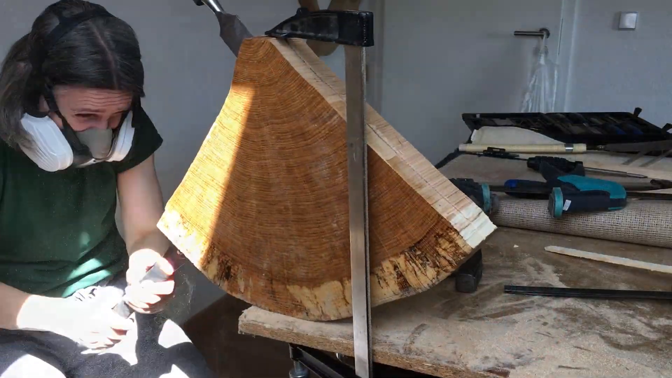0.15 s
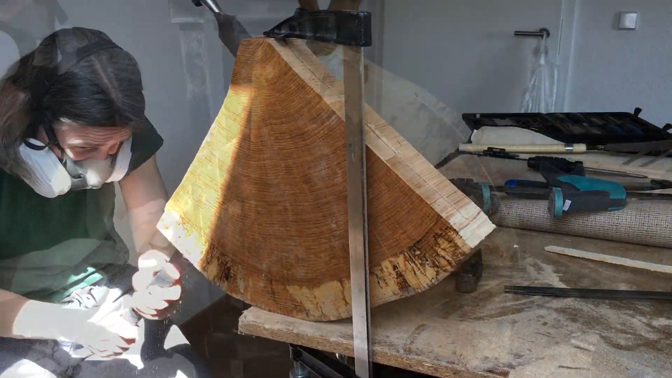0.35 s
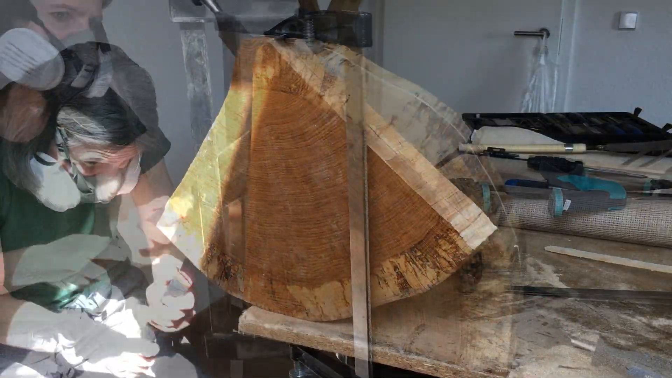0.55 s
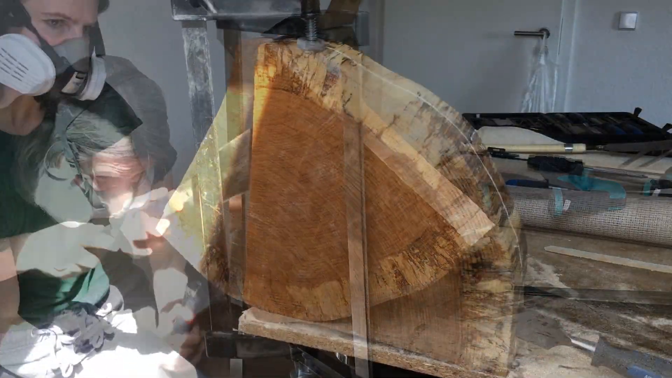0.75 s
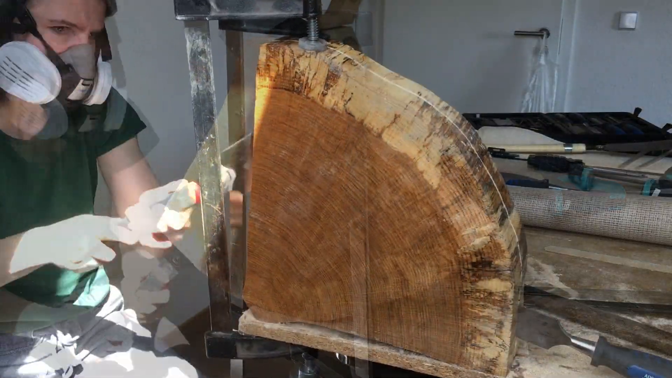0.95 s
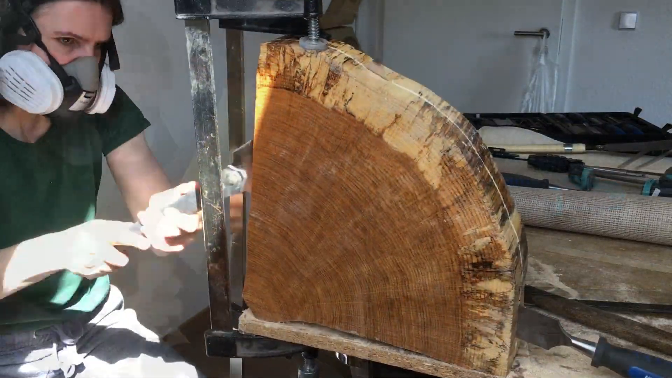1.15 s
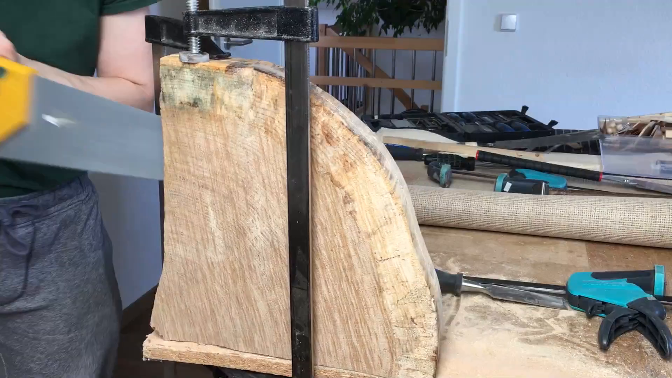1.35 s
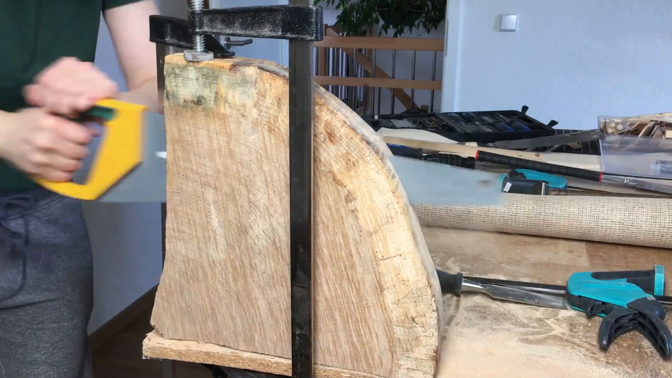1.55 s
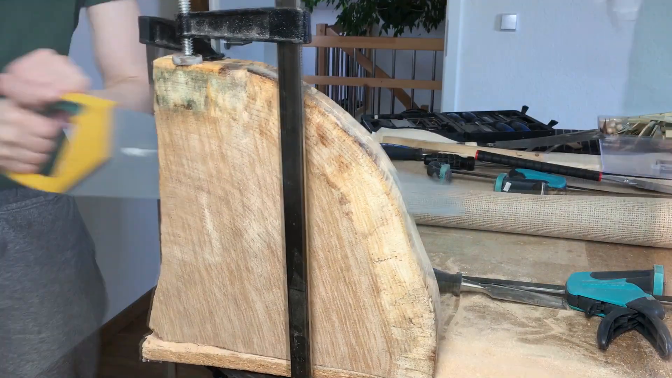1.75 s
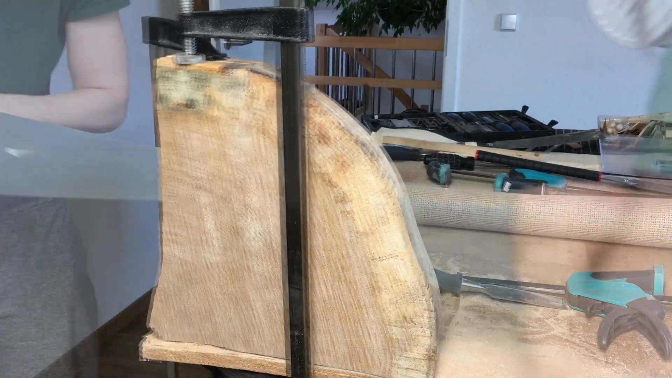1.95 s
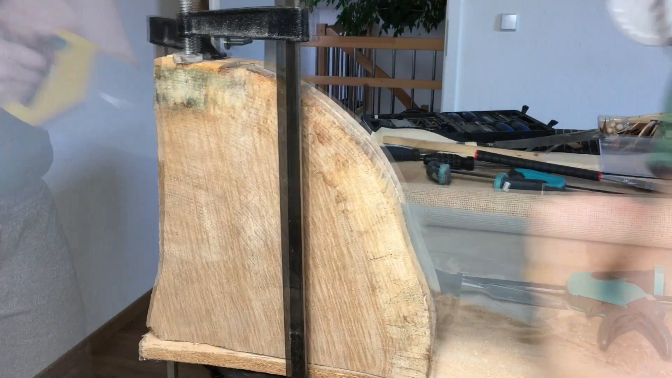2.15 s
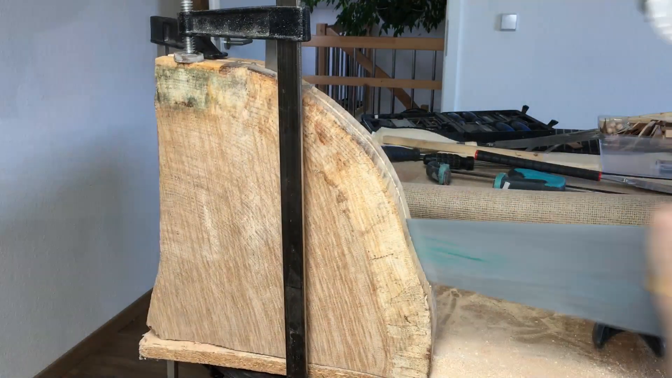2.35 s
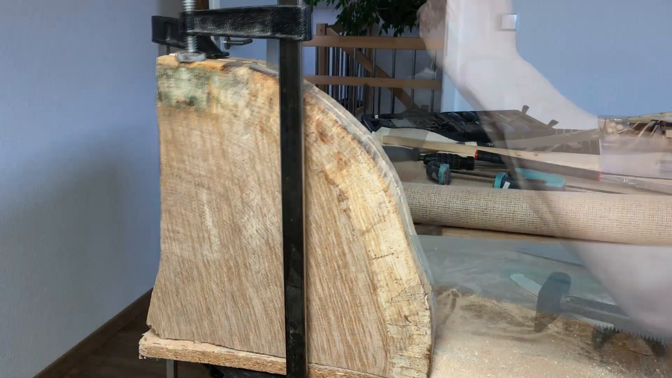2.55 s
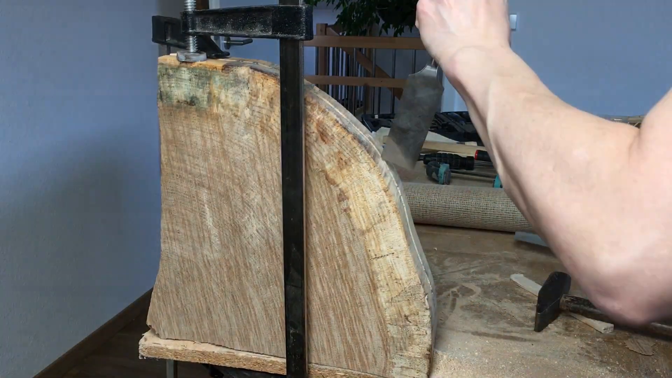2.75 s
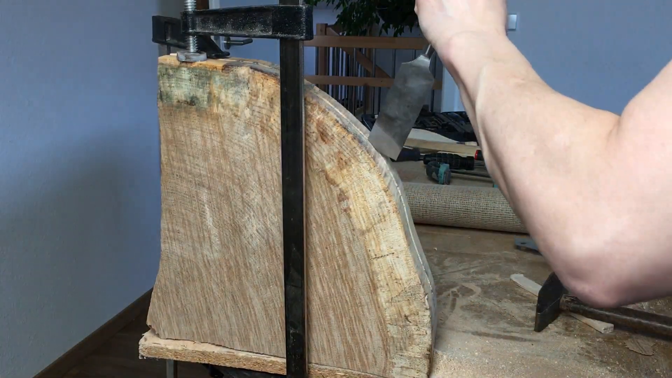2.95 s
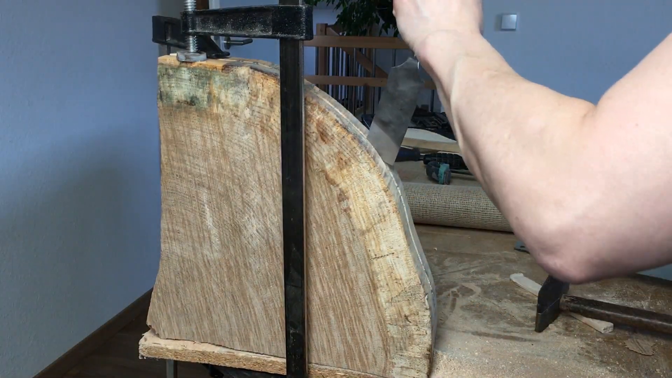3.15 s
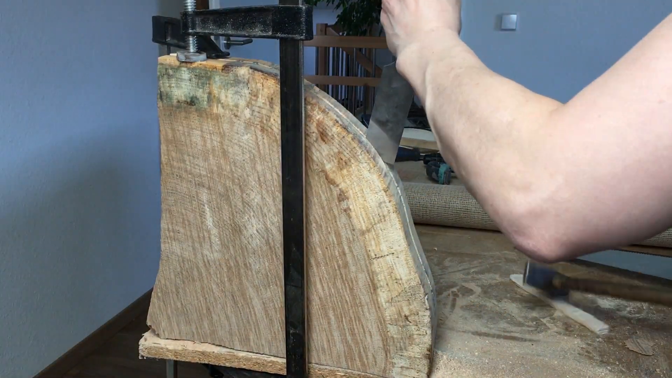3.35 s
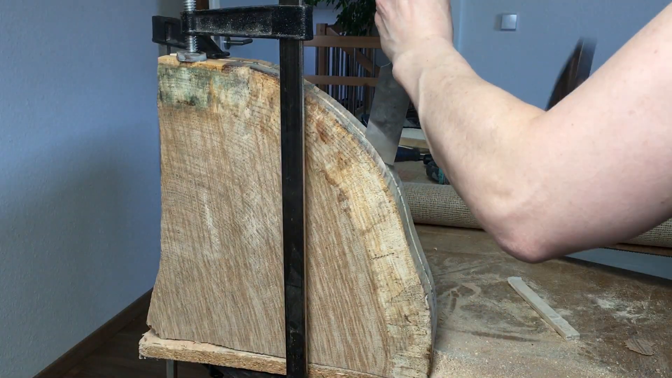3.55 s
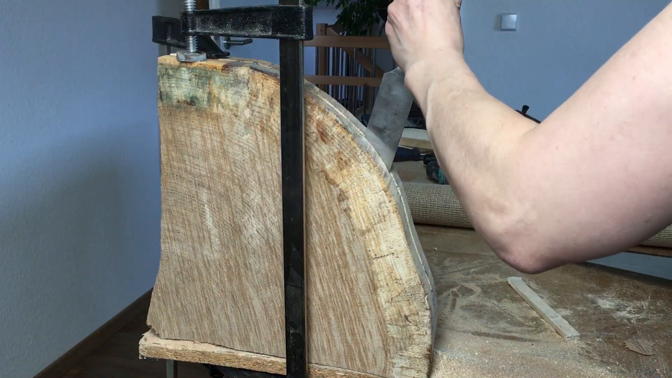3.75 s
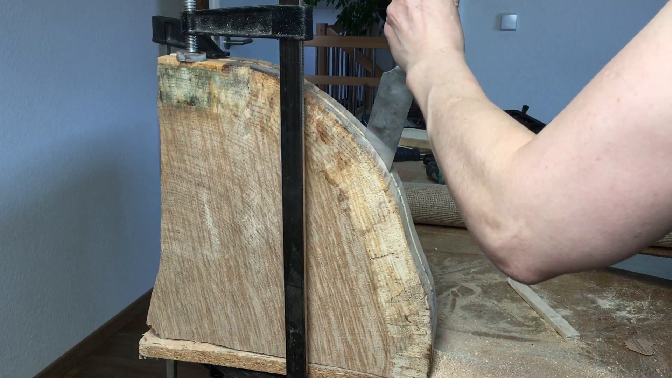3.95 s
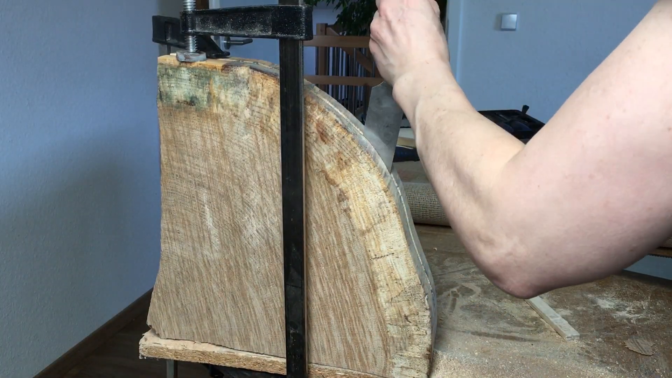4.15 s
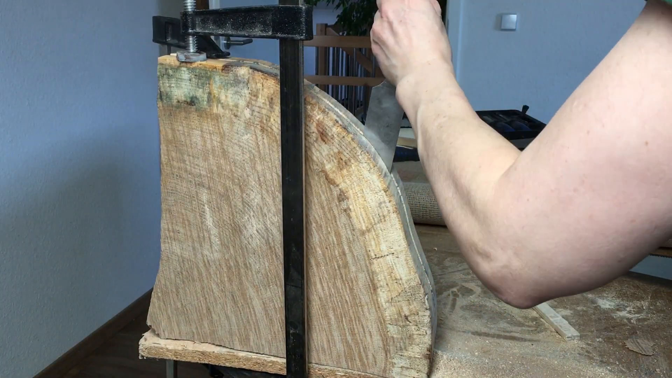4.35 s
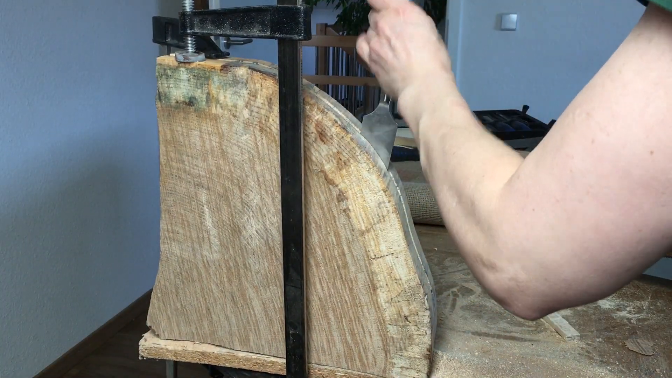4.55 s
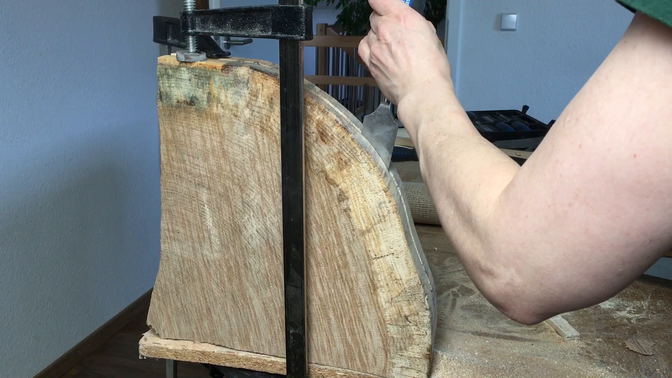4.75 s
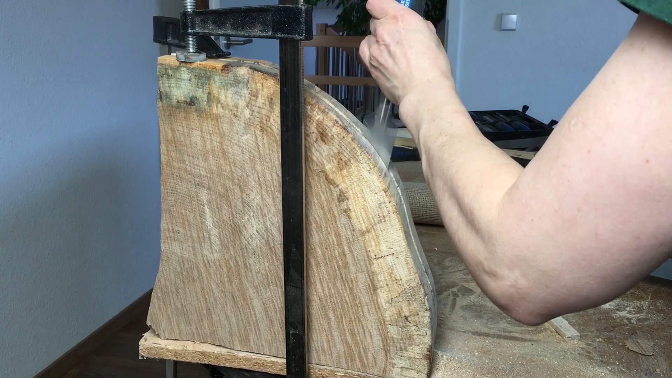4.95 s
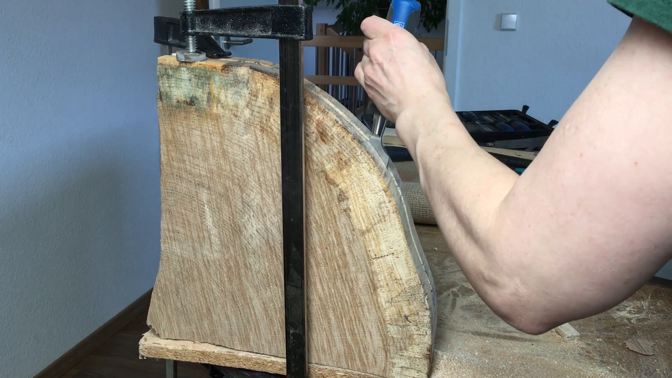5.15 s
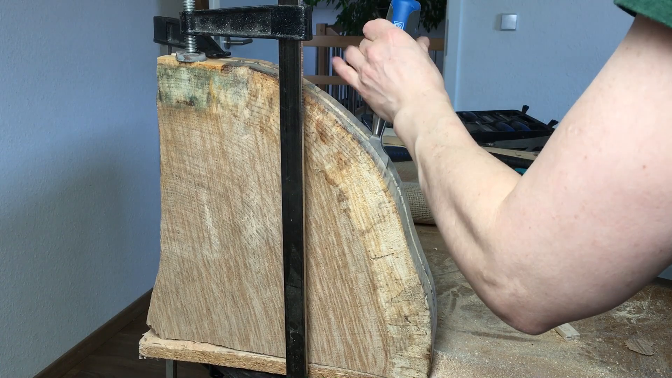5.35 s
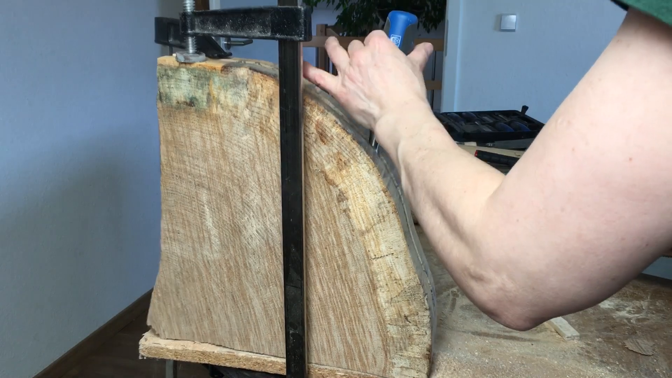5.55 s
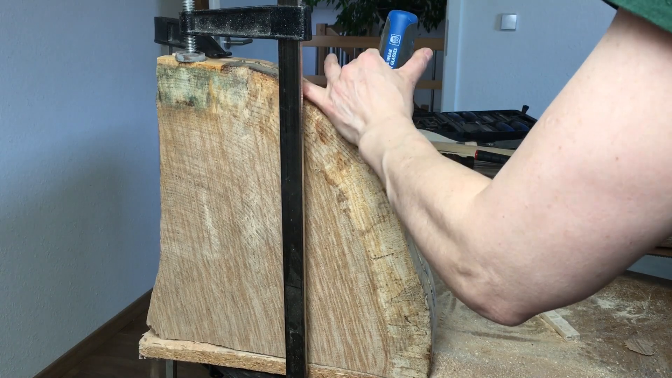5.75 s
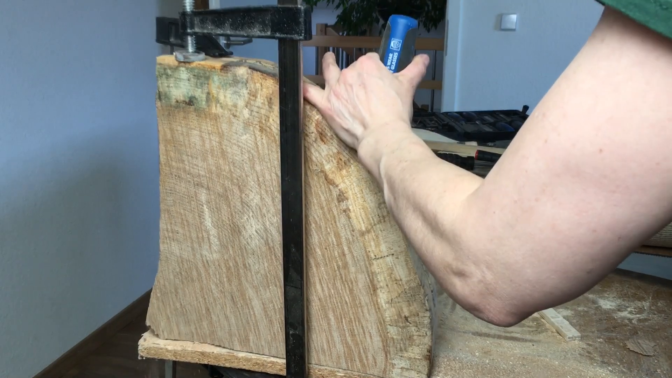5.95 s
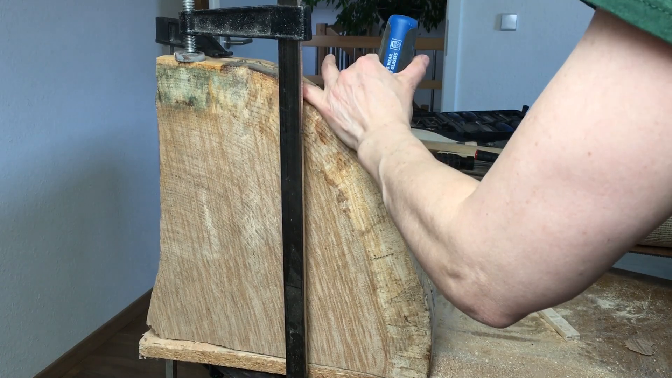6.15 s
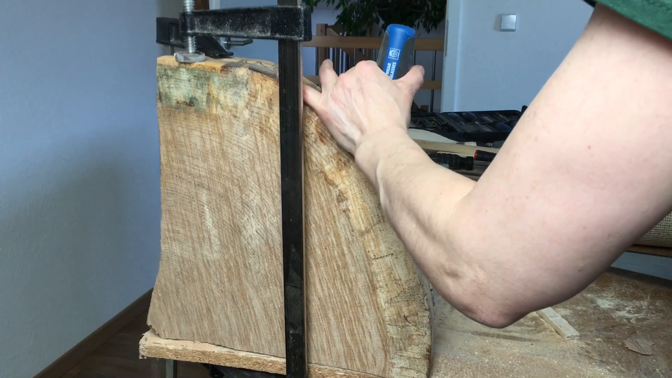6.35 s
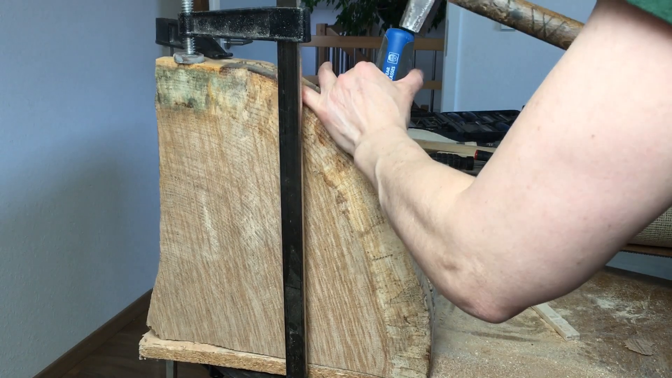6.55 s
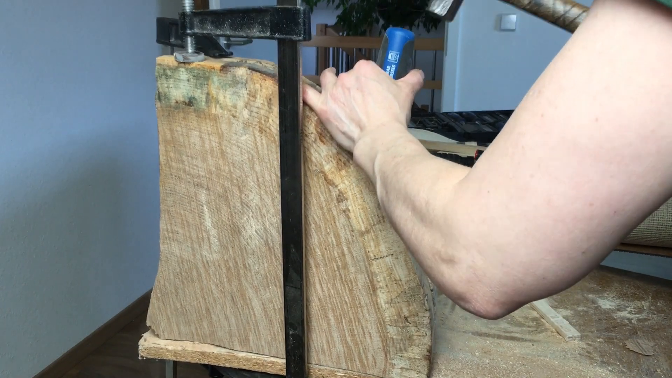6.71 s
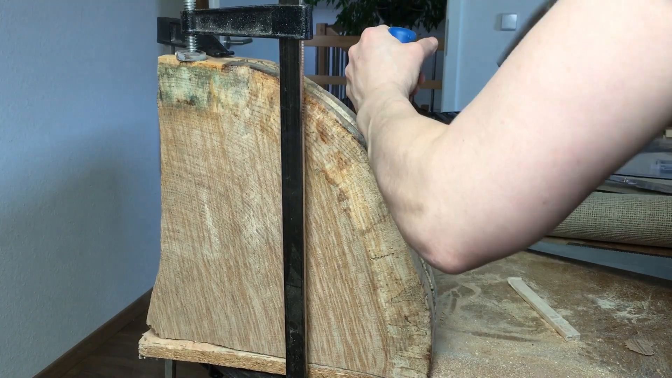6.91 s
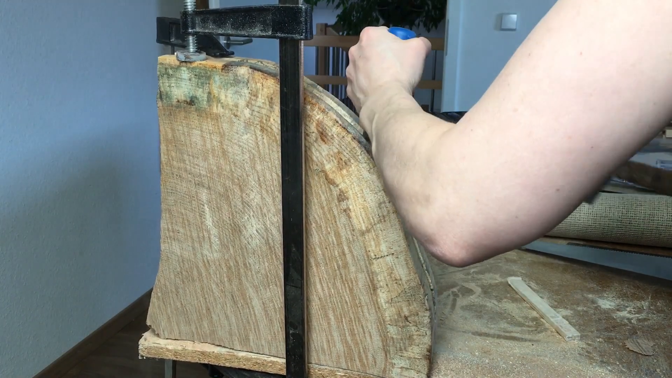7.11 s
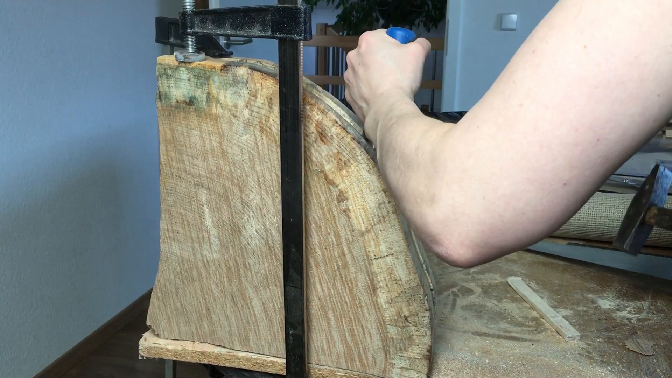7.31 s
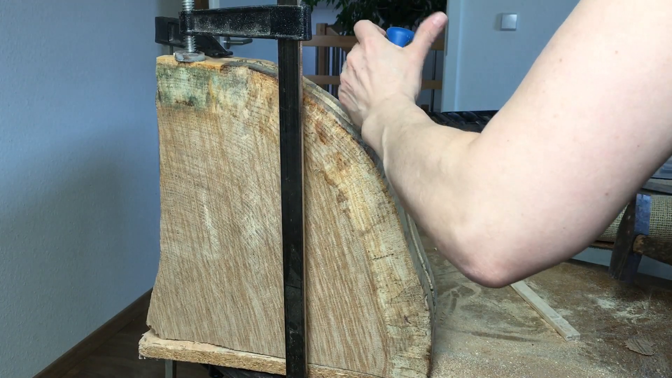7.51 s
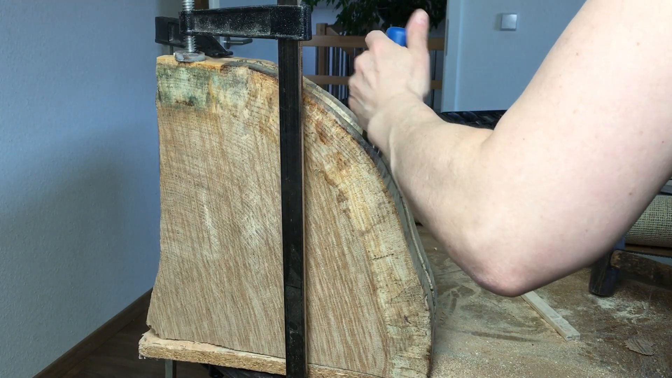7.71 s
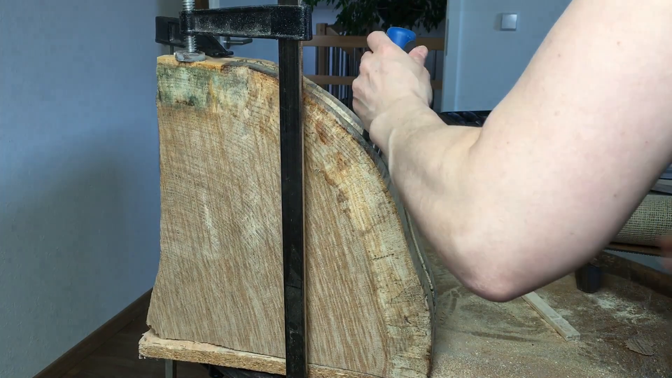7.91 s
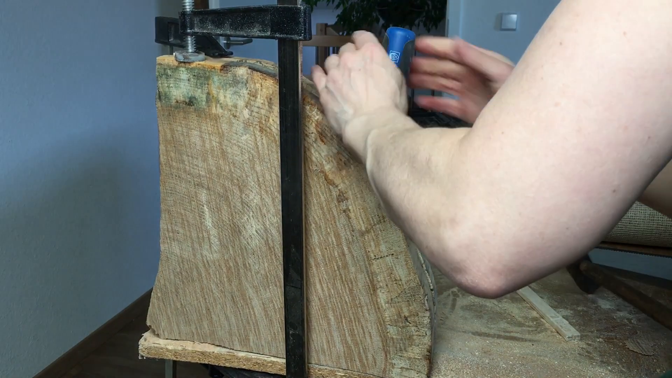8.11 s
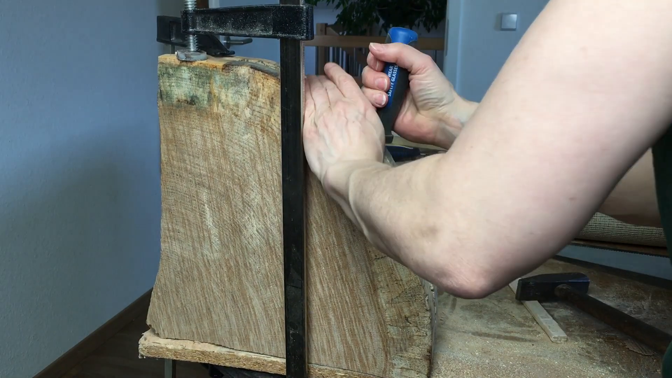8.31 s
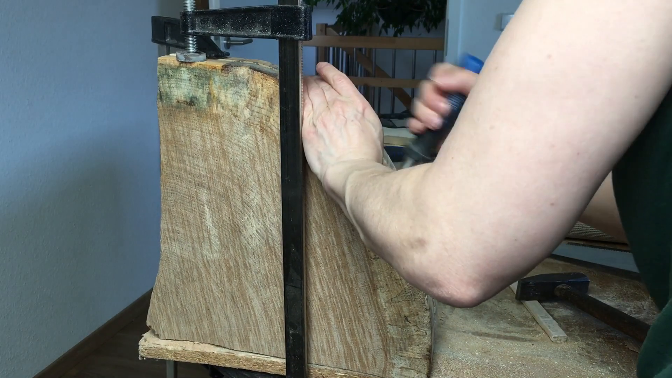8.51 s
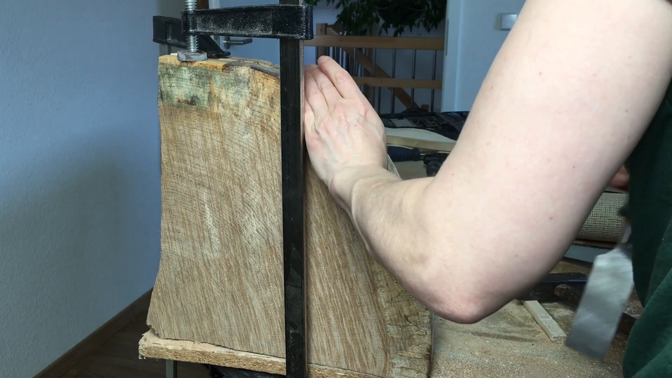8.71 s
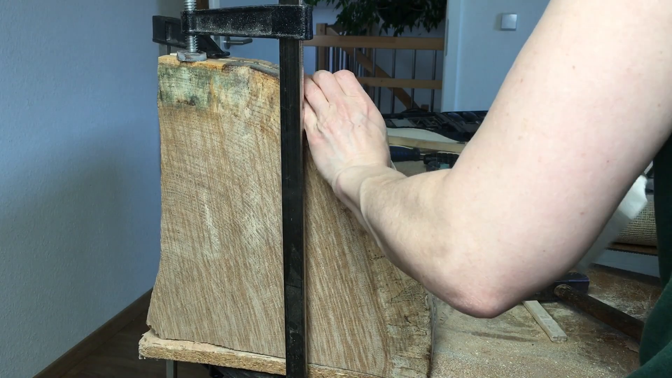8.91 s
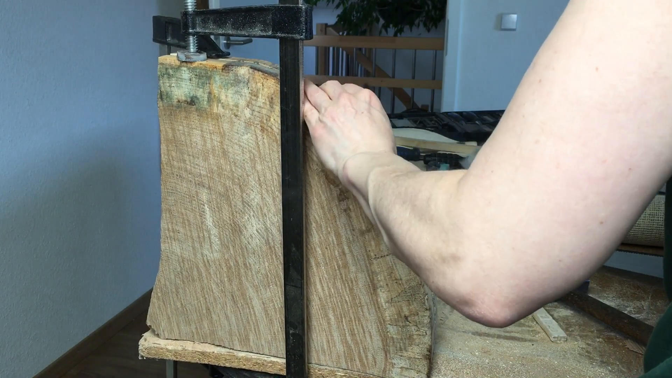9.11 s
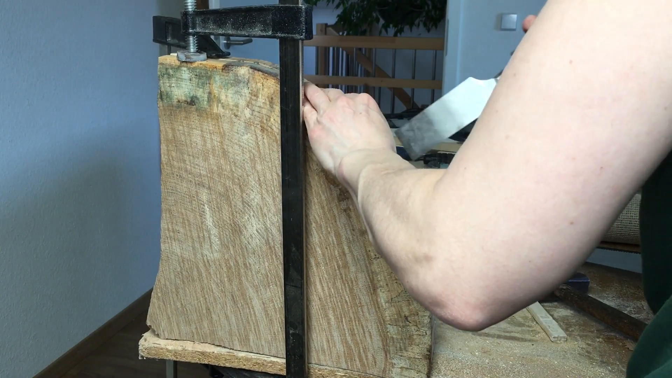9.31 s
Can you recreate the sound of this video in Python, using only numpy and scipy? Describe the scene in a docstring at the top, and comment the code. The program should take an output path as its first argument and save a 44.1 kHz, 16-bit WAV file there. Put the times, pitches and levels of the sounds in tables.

```python
"""In a small workshop a handsaw races through a clamped slab in very quick strokes, broken by short silences:
noise grains hiss and ring the kerf, swelling with each stroke. The saw is pulled out amid rustles, drags and
breath-like swells of shaped grains, and its wobbling blade sings as a gliding tone. Then a hammer drives
chisels into the slab: noise cracks die band by band, slab modes thud and steel modes ring. At last tools are
laid down, with more knocks, and sleeves rustle."""
import sys
import numpy as np
from scipy import signal
from scipy.fft import rfft, irfft
from scipy.io import wavfile

SR = 44100
rng = np.random.default_rng(int(sys.argv[2]) if len(sys.argv) > 2 else 0)


def volts(x):
    """Linear amplitude factor 10**(x/20) for a level x in dB, scalar or array-like."""
    e = np.asarray(x, float) / 20
    return 10 ** e


def store_pcm(level_fs):
    """Save levels as 16-bit WAV."""
    pcm = np.round(np.clip(level_fs, -1, 1) * 32767).astype(np.int16)
    wavfile.write(sys.argv[1], SR, np.atleast_2d(pcm).T)


N = 413216
SECONDS = np.arange(N) / SR

# Gaps where all sound drops out. Each row: start in seconds, end in seconds.
SILENCES = [(0.025, 0.029), (0.105, 0.108), (1.226, 1.268), (1.506, 1.549), (2.386, 2.404)]
# The sawyer's effort. Each row: time in seconds, relative tooth hiss in dB, relative bite in dB,
# push over pull in hiss in dB, push over pull in bite in dB.
EFFORT = [(0.017, -35, -50, -4, 1), (0.077, -35.5, -41.5, 2, 27), (0.168, -41, -45, 6.5, -2),
          (0.33, -39, -48, 7, -2), (0.72, -36.5, -43.5, 3, 8), (0.85, -35.5, -42.5, -1, 6.5),
          (1.2, -36, -44.5, 2, 11), (1.28, -29, -38, 5, 10), (1.5, -28.5, -37, 3.5, 3),
          (1.67, -29, -39, 2, 9.5), (2.0, -30, -36, -2.5, 12.5), (2.23, -26.5, -35.5, 2, 17),
          (2.39, -25.5, -29.5, 1.5, 5.5), (2.5, -29, -33, 11, 5), (2.671, -34.5, -48.5, -5.5, 13),
          (2.72, -53, -56, 0.1, 0.1)]
# Hammer on chisel, rebounds included. Each row: time in seconds, then relative crack, thud and treble in dB.
HAMMER = [(4.1369, -3, -31, -13.5), (4.581, -6.5, -30, -7.5), (4.5981, -4.5, -35, -22),
          (5.016, -1, -27.5, -2), (5.441, -3, -19.5, -10.5), (5.45, -26.5, -14, -21.5),
          (5.8707, -2, -13, -6.5), (6.2448, 1, -15.5, -2), (6.6039, -1, -14.5, -9),
          (6.8318, -11.5, -37.5, -7)]


def rms_one(x):
    """Scale to rms 1."""
    return x / np.sqrt(np.mean(x ** 2) + 1e-20)


def filtered(x, order, hz, kind="low"):
    """Butterworth filter."""
    return signal.sosfilt(signal.butter(order, hz, kind, fs=SR, output="sos"), x)


def in_time(rows):
    """Columns of a curve at every sample."""
    s, *columns = np.transpose(rows)
    return [np.interp(SECONDS, s, c) for c in columns]


def at_hz(points, hz, column=1):
    """Read a table on a log-frequency axis."""
    points = np.array(points)
    return np.interp(np.log(hz), np.log(points[:, 0]), points[:, column])


def clicks_at(times, sizes):
    """A train of single-sample clicks."""
    out = np.full(N, 1e-18)
    out[np.round(np.asarray(times) * SR).astype(int)] = sizes
    return out


def ring(clicks, hz, t60):
    """A unit click sets a decaying sine of starting height 1 ringing."""
    r = volts(-60 / (t60 * SR))
    w = 2 * np.pi * hz / SR
    return signal.lfilter([0, np.sin(w)], [1, -2 * r * np.cos(w), r * r], clicks)


def width_t60(width):
    """Decay time in seconds of a resonance of this width in Hz."""
    return np.log(1000) / (np.pi * width)


def dying(clicks, t60):
    """A unit click starts an exponential fall from 1."""
    return signal.lfilter([1], [1, -volts(-60 / (t60 * SR))], clicks)


def coloured(x, spectrum):
    """Shape white input by a spectrum; rms 1."""
    hz = np.arange(1, N // 2 + 2) * SR / N
    return rms_one(irfft(rfft(x) * volts(at_hz(spectrum, hz)), N))


def grains(per_s, spread_db):
    """Random clicks of uneven size; rms 1."""
    sizes = volts(spread_db * np.minimum(rng.exponential(1, N), 4)) * rng.standard_normal(N)
    return rms_one(sizes * (rng.random(N) < per_s / SR))


def flicker(per_s):
    """Random wander, joining normal draws of spread 1 made per_s times a second."""
    knots = rng.standard_normal(2000)
    return np.interp(SECONDS * per_s, np.arange(2000), knots)


def swell(rows):
    """Power of movements that rise for a share of their length, then die away."""
    rise_share, fall_db = 0.17, 21
    out = np.zeros(N)
    for start, length, peak_db in rows:
        u = (SECONDS - start) / length
        rise = np.clip(u / rise_share, 0, 1)
        fall = np.clip(u - rise_share, 0, 9) / (1 - rise_share)
        out += (rise * volts(peak_db - fall_db * fall)) ** 2
    return out


def all_blows():
    """Hammer and knocks as columns: time in seconds; crack, thud, wood, treble in dB; share of sharp tick."""
    # Tools and wood knocked or laid down. Each row: time in seconds, then relative crack, thud, wood in dB.
    knocks = [(2.621, -44, -35, -44), (2.6982, -39.5, -35.5, -40), (2.9191, -35.5, -54, -31),
              (3.4279, -45.5, -40, -64.5), (7.7845, -30.5, -8.5, -19.5), (7.925, -69, -30, -59),
              (8.0602, -15, -17, -19), (8.278, -9.5, -3.5, -16), (8.5601, -24.5, -36, -22),
              (8.632, -26.5, -39, -44)]
    rows = []
    for s, crack, thud, treble in HAMMER:
        wood = crack - 3.5 + 0.31 * (thud - crack)  # between crack and thud
        rows.append((s, crack, thud, wood, treble, .95))
    for s, crack, thud, wood in knocks:
        rows.append((s, crack, thud, wood, crack - 13.5, 0.56))
    return np.transpose(rows)


def room_hum():
    """The room hums faintly: steady noise, strongest in the bass around 150 Hz."""
    # Each row: frequency in Hz, relative density in dB.
    room_colour = [(88, -24.5), (150, -15), (309, -40), (361, -23), (484, -27.5), (1260, -32.5),
                   (4860, -46.5), (16000, -43.5)]
    return volts(-62) * coloured(rng.standard_normal(N), room_colour)


def bench_rumble():
    """The bench rumbles as weight leans on it and shakes on after each thud: low noise."""
    # Each row: frequency in Hz, relative density in dB.
    rumble_colour = [(15, -33), (25, -5.5), (65, 2), (92, 2.5), (166, -11.5), (209, -3), (400, -14.5),
                     (520, -41), (880, -120)]
    # Weight leans on the bench. Each row: start in seconds, length in seconds, relative peak in dB.
    leans = [(2.405, 0.69, -42), (2.8, 0.69, -37.5), (3.35, 0.55, -57), (8.5, 1.06, -50)]
    s, _, thud_db, *_ = all_blows()
    shake = dying(clicks_at(s, volts(thud_db - 25.5)), 1.51)
    power = swell(leans) + shake ** 2 + volts(-65) ** 2  # the last keeps it murmuring at rest
    return np.sqrt(power) * volts(1.5 * flicker(10)) * coloured(rng.standard_normal(N), rumble_colour)


def sleeve_rustle():
    """Sleeves and chips rustle: dense uneven grains that swell and die away."""
    # Each row: frequency in Hz, relative density in dB.
    rustle_colour = [(880, -32), (1500, -2), (1590, -2), (4040, -9), (4920, -12), (15100, -10),
                     (16000, -10)]
    # Each row: start in seconds, length in seconds, relative peak in dB.
    rustles = [(2.405, .5, -80), (3.25, 0.23, -53), (3.36, 0.37, -51), (3.63, 0.175, -55), (5.6, .25, -60),
               (6.7, 0.15, -65), (8.47, 0.42, -49.5), (8.75, 0.63, -55.5)]
    level = np.sqrt(swell(rustles) + volts(-77) ** 2)
    return level * volts(2.5 * flicker(25)) * coloured(grains(per_s=9000, spread_db=2.5), rustle_colour)


def drags_and_breaths():
    """Drags and breath-like swells: sparser, duller grains that rise and die away."""
    # Each row: frequency in Hz, relative density in dB.
    swell_colour = [(240, -45.5), (400, -6.5), (594, 8.5), (899, 0), (1260, 1.5), (2470, -14),
                    (4000, -17.5), (5200, -21.5), (8800, -120)]
    # Each row: start in seconds, length in seconds, relative peak in dB.
    swells = [(2.405, 0.81, -41.5), (2.895, 0.38, -45.5), (3.25, 0.47, -49.5), (3.63, 0.22, -58.5),
              (3.8, .35, -58), (7.25, 1.26, -63.5), (8.47, 0.44, -44), (8.7, 0.89, -47.5)]
    dull = coloured(grains(per_s=3900, spread_db=2.5), swell_colour)
    return np.sqrt(swell(swells)) * volts(0.5 * flicker(31.3)) * dull


def handling():
    """Room, bench, rustles, drags and breath-like swells, heard from the start of the last silence on."""
    quiet = room_hum() + bench_rumble() + sleeve_rustle() + drags_and_breaths()
    return filtered(quiet, 8, 15800) * (SECONDS > SILENCES[-1][0])


def blade_wobble():
    """The freed blade sings a nearly pure tone whose pitch follows its bend."""
    # Each row: time in seconds, centre pitch in Hz, relative level in dB.
    bends = [(2.56, 254.8, -55), (2.68, 275.3, -42), (2.702, 296.4, -49), (2.79, 219.3, -40.5),
             (2.952, 175, -47), (2.986, 169.7, -52), (3.062, 237, -39.5), (3.172, 188.6, -42.5),
             (3.22, 200, -59)]
    hz, level_db = in_time(bends)
    phase = 2 * np.pi * np.cumsum(hz * (1 + 0.0172 * flicker(60))) / SR
    on = np.clip(np.minimum(SECONDS - bends[0][0], bends[-1][0] - SECONDS) / 0.025, 0, 1)
    tone = np.sin(phase) + volts(-19) * np.sin(3 * phase) + volts(-24) * np.sin(4 * phase)
    return np.sqrt(2) * volts(level_db + 2.5 * flicker(30)) * on * tone


def steel():
    """The hand damps chisel modes far from the favoured pitch; the hammer head pings high; the room smears both."""
    # Steel set ringing. Each row: time in seconds, relative chisel level in dB,
    # chisel pitch favoured by the grip in Hz, relative hammer head level in dB.
    strikes = [(4.139, -31, 2450, -40), (4.582, -25, 3500, -27), (5.015, -16, 2380, -46),
               (5.442, -28, 2400, -47), (5.872, -30, 1800, -52), (6.248, -27, 2400, -46),
               (6.605, -28, 2720, -29), (6.831, -25, 1210, -60), (8.058, -16, 3700, -75)]
    # Each row of both: frequency in Hz, relative level in dB, t60 in seconds.
    chisel_modes = [(1130, -5, .12), (1205, 0, .4), (1240, -3, .35), (2310, -1, .18), (2375, -2, .36),
                    (2480, -1, .14), (2700, -2, .12), (3550, -2, .08), (3720, 0, .1), (5800, 5, .045)]
    head_modes = [(11340, -14, .35), (14300, -6, .12)]
    s, chisel_db, favoured, head_db = np.transpose(strikes)
    out = np.zeros(N)
    for hz, level_db, t60 in chisel_modes:
        damped_db = -26 * np.abs(np.log2(hz / favoured))  # per octave away
        hit_db = chisel_db + level_db + damped_db + rng.normal(0, 2.5, len(s))
        chatter = .6 + .75 * flicker(160)  # the chisel chatters in the wood
        out += ring(clicks_at(s, volts(hit_db)), hz, t60) * chatter
    for hz, level_db, t60 in head_modes:
        out += ring(clicks_at(s, volts(head_db + level_db)), hz, t60)
    half = SR // 2
    echoes = rng.standard_normal(half) * volts(-60 * SECONDS[:half] / 0.3)
    return out + volts(-39) * signal.fftconvolve(out, echoes)[:N]


def cracks():
    """Each blow sends a sharp tick and a noisy crack into the room, dying band by band."""
    # Centres of thud, wood, crack and treble in Hz.
    part_hz = [170, 700, 3000, 10000]
    # Each row: frequency in Hz, relative density in dB.
    blow_colour = [(50, -13), (100, -10.5), (250, -2), (500, -5), (1000, -8.5), (2400, -13.5), (5000, -21),
                   (8000, -26), (14000, -26), (17000, -36)]
    # Decay after a blow. Each row: frequency in Hz, first t60 in seconds, room t60 in seconds.
    decay = [(60, 0.08, 0.42), (166.4, 0.38, 0.28), (419.8, 0.22, 0.58), (1120, 0.23, 0.55),
             (2750, 0.25, 0.58), (7100, 0.27, 0.46), (15170, 0.1, 0.15)]
    s, crack_db, thud_db, wood_db, treble_db, tick = all_blows()
    levels = np.transpose([thud_db + 6, wood_db + 1, crack_db - 4.0, treble_db + 1.5])
    edges = 44 * 2 ** (np.arange(27) / 3)  # third-octave bands, in Hz
    white, out = rng.standard_normal((2, N)), np.zeros(N)
    for k, (low, high) in enumerate(zip(edges, edges[1:])):
        hz = np.sqrt(low * high)
        band_db = np.array([np.interp(np.log(hz), np.log(part_hz), row) for row in levels])
        size = volts(band_db + at_hz(blow_colour, hz) + rng.normal(0, 2.5, len(s)))
        hits = clicks_at(s, size)
        fall = dying(hits, at_hz(decay, hz)) + volts(-14) * dying(hits, at_hz(decay, hz, column=2))
        fall -= 0.7 * dying(hits, 12 / hz + 0.0032)  # lows and echoes build up later
        fall += 3.0 * dying(clicks_at(s, size * tick), 0.012)  # the direct tick
        out += volts(12.5) * filtered(fall * white[k % 2], 2, [low, high], "band")
    return out


def slab_thuds():
    """Blows ring the modes of slab and bench: lows answer the thud, mids the wood, the rest the crack."""
    # Each row: frequency in Hz, relative level in dB, t60 in seconds.
    slab_modes = [(98.8, 0, 0.36), (143.7, -2, 0.35), (210, -0.5, 0.23), (259, -5, 0.43),
                  (370, -10.5, 0.53), (495, -4, 0.16), (748, 0.5, 0.062), (1040, -1.5, 0.099),
                  (1493, -3.5, .07), (1990, -14.5, .06), (2260, -10.5, .06), (3870, -13.5, .06)]
    s, crack_db, thud_db, wood_db, *_ = all_blows()
    out = np.zeros(N)
    for hz, level_db, t60 in slab_modes:
        cause_db = thud_db if hz < 400 else wood_db if hz < 1800 else crack_db
        size = volts(cause_db + level_db - 6.0 + rng.normal(0, 1.6, len(s)))
        push = clicks_at(s, size * rng.choice([-1, 1], len(s)))
        soft = np.hanning(int(SR / hz * 0.49) + 3)  # the heavy slab is pushed, not tapped
        out += ring(np.convolve(push, soft / soft.sum())[:N], hz, t60)
    return out


def floor_boom():
    """The floor booms under hammer blows: one low mode, softly pushed."""
    s, _, _, wood_db, *_ = all_blows()[:, :len(HAMMER)]
    push = np.convolve(clicks_at(s, volts(wood_db - 13.5)), np.hanning(1000) / 500)[:N]
    return ring(push, hz=37, t60=.9) * volts(3.0 * flicker(25))


def strokes():
    """Times, gaps and levels of all strokes; pull and push take turns within each run."""
    # Runs of strokes. Each row: first stroke in seconds, last stroke in seconds, slowing share.
    runs = [(0.017, 0.077, -0.6), (0.116, 0.116, 0), (0.168, 1.202, 0.01), (1.277, 1.499, 0.02),
            (1.541, 1.935, 0.01), (1.982, 2.338, 0.03), (2.378, 2.378, 0), (2.505, 2.72, 0.01)]
    # Number of strokes in each run.
    run_strokes = [3, 1, 33, 6, 10, 8, 1, 5]
    s, push = [], []
    for (first, last, slowing), count in zip(runs, run_strokes):
        u = np.linspace(0, 1, count)
        s += list(first + (last - first) * (u + slowing * (u * u - u)))
        push += list(np.arange(count) % 2 - .5)
    push = np.array(push)
    at, *columns = np.transpose(EFFORT)
    hiss_db, bite_db, hiss_lead_db, bite_lead_db = [np.interp(s, at, c) for c in columns]
    uneven = 2.83 * rng.standard_normal((len(s), 2))  # dB, stroke to stroke
    hiss_db = hiss_db + push * hiss_lead_db + uneven[:, 0]
    bite_db = bite_db + push * bite_lead_db + uneven[:, 1]
    return s, np.minimum(np.gradient(s), .055), hiss_db, bite_db


def stroke_powers():
    """Hiss and bite power: each stroke swells and fades with blade speed."""
    hiss_width, bite_width = .27, .24  # shares of the gap between strokes
    bite_rise, bite_fall = .75, 1.35  # the teeth dig in fast and let go slowly: factors on the width
    hiss_power, bite_power = np.zeros((2, N))
    for s, gap, hiss_db, bite_db in zip(*strokes()):
        near = slice(max(int((s - .1) * SR), 0), int((s + .1) * SR))
        lag = np.abs(SECONDS[near] - s) / gap  # slower strokes last longer
        rest = volts(2 * -19) * np.exp(-lag / .9)  # the blade never quite rests
        hiss_power[near] += volts(2 * hiss_db) * (np.exp(-(lag / hiss_width) ** 2.6) + rest)
        side = np.where(SECONDS[near] < s, bite_rise, bite_fall)
        bite_power[near] += volts(2 * bite_db) * (np.exp(-(lag / bite_width / side) ** 2) + rest)
    return hiss_power, bite_power


def tooth_hiss():
    """Teeth tear fibres: very dense grains, bright in colour; rms 1."""
    # Each row: frequency in Hz, relative density in dB.
    hiss_colour = [(700, -22.5), (1100, -10.5), (2500, -0.5), (4400, -2.5), (5000, -1.5), (5600, 0.5),
                   (10500, 0.5), (14700, 1), (16000, -15)]
    return coloured(grains(per_s=24000, spread_db=0.0), hiss_colour)


def kerf_bite():
    """Biting teeth ring the resonances of blade and kerf, each flickering by itself; rms 1."""
    # Each row: frequency in Hz, width in Hz, relative level in dB.
    kerf_modes = [(1270, 170, -3), (1554, 170, -1.5), (1850, 200, -1), (2590, 600, -8), (3250, 260, -1),
                  (3950, 380, 0.5)]
    bites, bite = grains(per_s=4800, spread_db=-3.0), np.zeros(N)
    for hz, width, level_db in kerf_modes:
        mode = rms_one(ring(bites, hz, width_t60(width)))
        bite = -bite + volts(level_db + 2.2 * flicker(40)) * mode  # neighbours differ in sign
    return rms_one(filtered(bite, 4, 1050, "high"))  # the thin blade radiates no lows


def tooth_snags():
    """A tooth catches: a burst of noise with a fast and a slower fall."""
    # Each row: time in seconds, relative peak in dB.
    snags = [(0.0541, -19), (0.1669, -25), (0.2337, -22), (0.3002, -27), (0.3235, -30), (0.627, -22)]
    s, peak_db = np.transpose(snags)
    caught = clicks_at(s, volts(peak_db))
    fall = dying(caught, .01) + volts(-12) * dying(caught, .06)
    return filtered(fall * rng.standard_normal(N), 2, [900, 9000], "band")


def slab_drone():
    """The sawn slab drones with the effort, favours some pitches and jolts dully in its clamp."""
    # Each row: frequency in Hz, relative density in dB.
    drone_colour = [(59, -77), (100, -21), (164, -2.5), (205, 5), (417, 2), (539, 4.5), (828, 0.5),
                    (1020, 3), (1300, -1), (1690, 5), (2860, -120)]
    # Favoured pitches. Each row: frequency in Hz, width in Hz, relative level in dB.
    drone_peaks = [(273, 82, 2.5), (605, 32, 0.5), (890, 95, 4)]
    # The slab shifts in its clamp. Each row: start in seconds, length in seconds, relative peak in dB.
    jolts = [(0.055, .1, -40), (0.096, .05, -41)]
    body = coloured(grains(per_s=2500, spread_db=4.0), drone_colour)
    sung = np.zeros(N)
    for hz, width, level_db in drone_peaks:
        sung += volts(level_db) * ring(body, hz, width_t60(width)) * width
    # the drone follows a share of the swing in hiss effort around -35.5 dB
    effort = volts(-51 + 0.58 * (in_time(EFFORT)[0] + 35.5))
    drone = effort * (body + 0.47 * rms_one(sung)) * (SECONDS < SILENCES[-1][0])
    drone += np.sqrt(swell(jolts)) * rms_one(filtered(body, 3, 800))
    return drone * volts(2.5 * flicker(40))


def saw():
    """The strokes shape tooth hiss and kerf bite; snags and the slab's drone join them."""
    hiss_power, bite_power = stroke_powers()
    hiss = volts(-1.5) * np.sqrt(hiss_power) * tooth_hiss()
    bite = volts(-1.0) * np.sqrt(bite_power) * kerf_bite()
    cut = hiss + bite + tooth_snags() + slab_drone()
    return filtered(filtered(cut, 3, 120, "high"), 10, 15900)


def scene():
    """All sources, with the silences cut in."""
    open_gain = np.ones(N)
    for start, end in SILENCES:
        shut = (SECONDS > start) & (SECONDS < end)
        tail = volts(-34 - 3500 * (SECONDS[shut] - start))  # a faint tail dies after the cut
        reopening = np.clip(1 - (end - SECONDS[shut]) / 0.0018, 0, 1) ** 2
        open_gain[shut] = np.maximum(tail, reopening)
    blows = cracks() + slab_thuds() + floor_boom()
    mix = handling() + blade_wobble() + steel() + blows + saw()
    return (mix * open_gain)[None]


def low_pass(x):
    """Removes everything above the highest recorded frequency."""
    return signal.sosfilt(signal.butter(12, 16980, fs=SR, output="sos"), x)


def record(dry):
    """Overload rounds the peaks of the mix."""
    rounded = .95 * np.tanh(dry / .95)
    return low_pass(rounded)


dry = scene()
out = record(dry)
store_pcm(out)
```